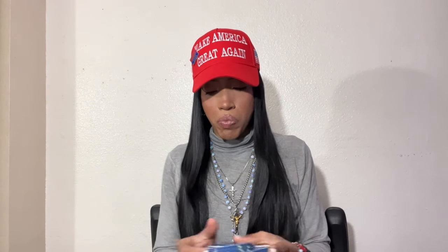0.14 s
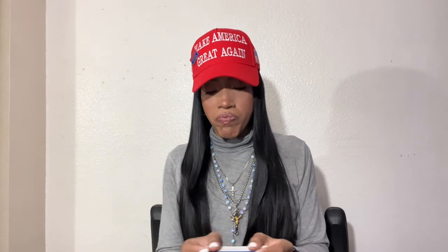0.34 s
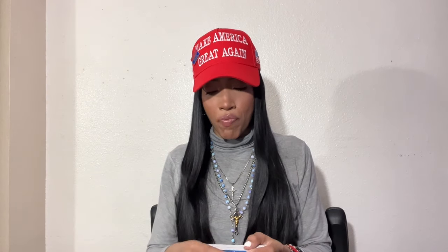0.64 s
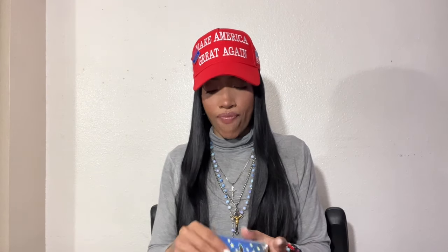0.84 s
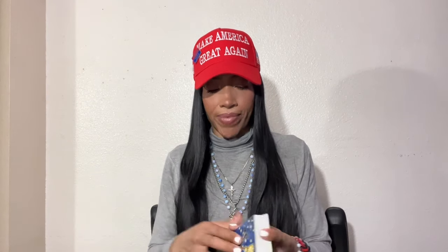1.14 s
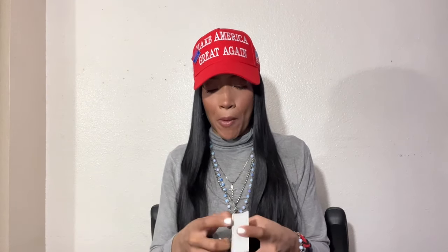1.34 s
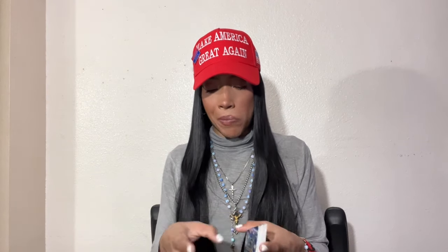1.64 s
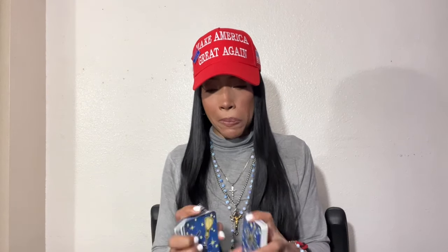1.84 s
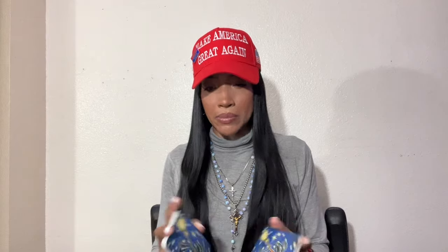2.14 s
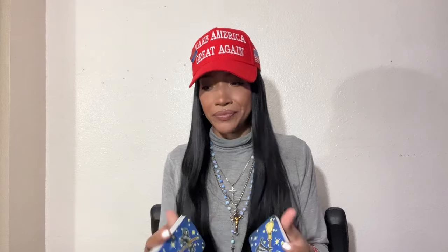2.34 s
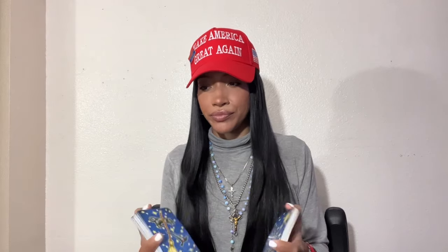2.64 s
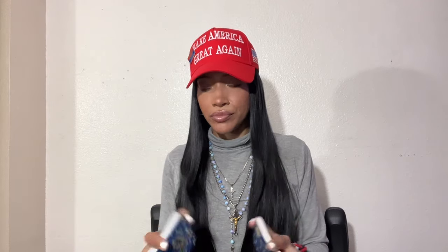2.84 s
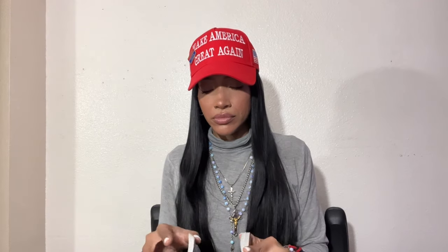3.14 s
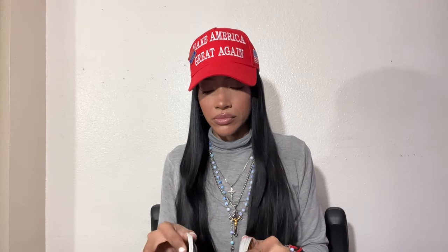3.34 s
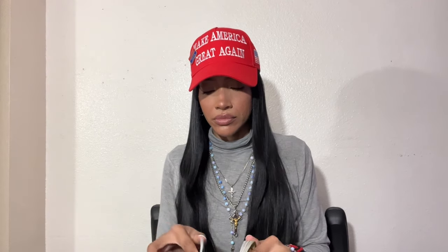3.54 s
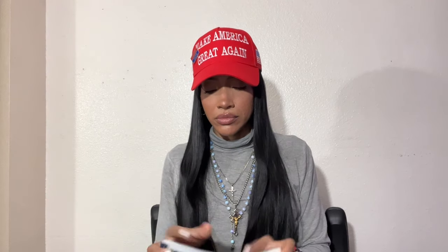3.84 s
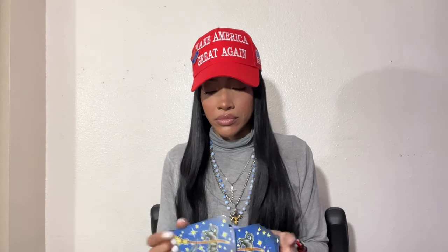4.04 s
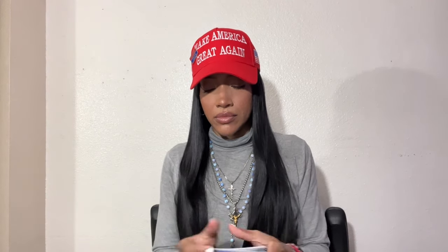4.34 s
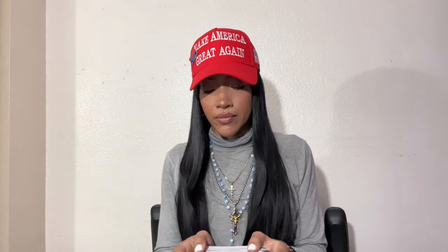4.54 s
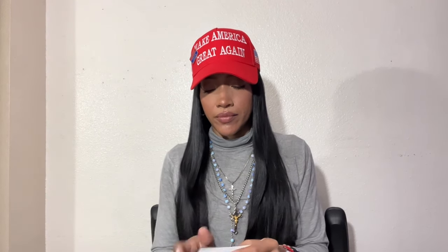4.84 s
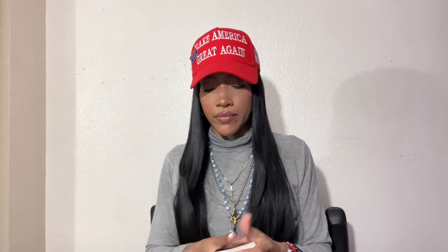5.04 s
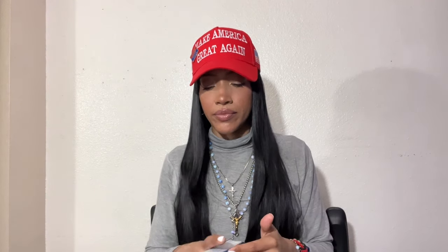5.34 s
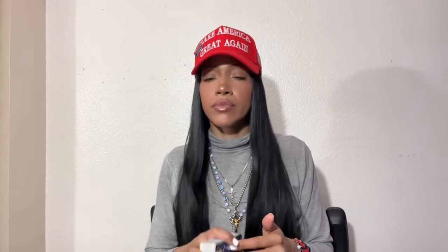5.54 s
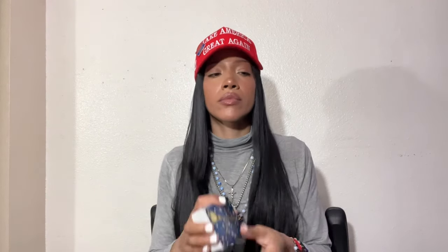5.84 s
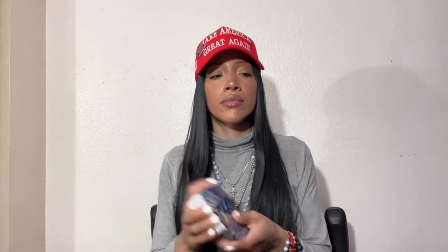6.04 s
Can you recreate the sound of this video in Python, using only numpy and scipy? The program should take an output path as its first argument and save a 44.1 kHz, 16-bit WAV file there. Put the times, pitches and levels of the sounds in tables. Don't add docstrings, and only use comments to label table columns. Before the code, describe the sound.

A deck of cards is squared, cut with a knock, riffled in a crackling burst, then tapped firmly on a table in a quiet room.

```python
import sys
import numpy as np
from scipy import signal
from scipy.fft import rfft, irfft, next_fast_len
from scipy.io import wavfile
from scipy.ndimage import uniform_filter1d

SR = 44100
rng = np.random.default_rng(int(sys.argv[2]) if len(sys.argv) > 2 else 0)


def voltage_ratio(level):
    return 10 ** (np.asarray(level, float) / 20)


def to_wav(s):
    ch = np.atleast_2d(s).T
    pcm = np.round(np.clip(ch, -1, 1) * 32767)
    wavfile.write(sys.argv[1], SR, pcm.astype(np.int16))


N = 272979


def evened(x):
    return x / np.sqrt(np.mean(x ** 2) + 1e-20)


def read(points, hz):
    f, value = np.transpose(points)
    return np.interp(np.log(hz + 1), np.log(f + 1), value)


def add(mix, s, sound):
    part = mix[max(round(s * SR), 0):][:len(sound)]
    part += sound[:len(part)]


def coloured(x, spectrum):
    size = next_fast_len(len(x))
    gain = voltage_ratio(read(spectrum, np.fft.rfftfreq(size, 1 / SR)))
    return evened(irfft(rfft(x, size) * gain, size)[:len(x)])


def ring(t, hz, t60):
    return voltage_ratio(-60 * t / t60) * np.sin(2 * np.pi * hz * t)


def hum():
    # (time [s], level [dB])
    hum_level = [(0.0, -78), (0.17, -53), (2.55, -50.5), (2.71, -63), (3.15, -48), (3.57, -49), (3.64, -46),
                 (3.71, -54), (4.5, -49.5), (4.74, -56.5), (5.12, -48), (5.62, -56), (5.72, -50),
                 (6.19, -51.5)]
    motor_hz, width_hz = 59.6, 0.4
    t = np.arange(N) / SR
    drift = evened(uniform_filter1d(uniform_filter1d(rng.standard_normal(N), 9000), 9000))
    turns = np.cumsum(motor_hz + 0.5 * width_hz * drift) / SR
    return np.sqrt(2) * voltage_ratio(np.interp(t, *np.transpose(hum_level))) * np.sin(2 * np.pi * turns)


def air():
    # (frequency [Hz], level per Hz [dB])
    air_colour = [(20, -27), (55, 9), (90, -1.5), (300, -15.5), (600, -33.5), (1500, -44.5), (15500, -41.5),
                  (16400, -56.5)]
    return voltage_ratio(-57) * np.array([coloured(noise, air_colour) for noise in rng.standard_normal((2, N))])


def strokes():
    # (peak time [s], swell [s], fade [s], rub level [dB], edge over face [dB])
    cut_strokes = [(0.0, .02, 0.21, -55, 2.5), (0.1, 0.59, 0.51, -55.5, -8.5),
                   (0.173, 0.048, 0.071, -42.5, 5.5), (0.295, 0.04, 0.049, -64.5, 14.5),
                   (0.467, 0.17, 0.017, -65.5, 11), (0.655, 0.067, 0.086, -54, 3),
                   (0.78, 0.46, 0.2, -66, 4.5), (0.98, 0.014, 0.12, -65, 2),
                   (1.05, 0.064, 0.086, -71.5, 14), (1.155, .01, .05, -97.5, 7),
                   (1.238, 0.0068, 0.078, -68.5, 6), (1.29, 0.031, 0.049, -78, 20.5),
                   (1.399, .005, 0.95, -79.5, 1), (1.46, 0.023, 0.059, -72.5, 5.5),
                   (1.78, 0.12, 0.16, -72, 12), (1.87, 0.022, 0.23, -63, 7.5),
                   (1.944, 0.032, 0.071, -57.5, -14.5), (2.0, 0.037, 0.065, -77, 13),
                   (2.1, 0.054, 0.075, -102, 29), (2.246, 0.0089, 0.043, -74, -12.5),
                   (2.3, 0.057, 0.18, -84.5, 20), (2.56, 0.28, 0.21, -84.5, 20),
                   (2.781, 0.062, 0.1, -75.5, 9.5), (2.88, 0.061, 0.077, -82.5, 13)]
    # (peak time [s], swell [s], fade [s], rub level [dB], edge over face [dB])
    riffle_strokes = [
        (2.987, 0.008, 0.077, -40.5, 0),
        (3.067, 0.0071, 0.48, -52.5, -12.5),
        (3.159, 0.071, 1, -39, 1.5),
        (3.319, 0.064, 0.27, -41.5, 2.5),
        (3.427, 0.072, 0.054, -40, -10.5),
        (3.515, .04, 0.17, -30, 1),
        (3.637, 0.15, 0.12, -30.5, 0.5),
        (3.76, 0.041, 0.31, -85, 1.5),
    ]
    # (peak time [s], swell [s], fade [s], rub level [dB], edge over face [dB])
    square_strokes = [(3.962, 0.033, 0.024, -49.5, 13.5), (4.065, 0.099, 0.036, -76, 15.5),
                      (4.135, 0.057, 0.1, -49, 8), (4.156, 0.035, 0.09, -47, -11.5),
                      (4.308, 0.044, 0.15, -46.5, -7.5), (4.326, 0.024, 0.19, -48.5, 7),
                      (4.49, 0.062, 0.029, -79, -19), (4.55, 0.08, 0.047, -82, 21),
                      (4.601, 0.057, 0.068, -53.5, 4.5), (4.799, 0.14, 0.15, -56.5, 2.5),
                      (5.031, 0.038, 0.4, -65, -3), (5.141, 0.29, 0.42, -62.5, 3.5),
                      (5.269, 0.015, 0.078, -68.5, -17), (5.341, 0.1, 0.15, -71.5, 4),
                      (5.44, 0.076, 0.049, -57, 8.5), (5.64, 0.013, 0.059, -42, -16),
                      (5.74, 0.11, 0.1, -70, -18), (5.785, 0.04, 0.11, -91, 16),
                      (5.93, 0.004, 0.096, -75.5, 12.5), (6.062, 0.042, 0.036, -45.5, 11),
                      (6.078, 0.044, 0.1, -47, -5)]
    bending_db, bending_tilt = -3, 1.424
    t = np.arange(0, N + 64, 64) / SR
    power = 1e-24
    for s, swell, fade, db, edge_db in cut_strokes + riffle_strokes + square_strokes:
        away = np.maximum((s - t) / max(swell, .002), (t - s) / max(fade, .002))
        shape_db = db - 20 * away
        parts_db = np.array([[bending_db - bending_tilt * edge_db], [0], [edge_db]])
        power = power + voltage_ratio(shape_db + parts_db) ** 2
    return [np.interp(np.arange(N) / SR, t, gain) for gain in np.sqrt(power)]


def slide(grains_per_s=1200, spread_db=1.6, smooth=1.2, patchy_db=3.0):
    # (frequency [Hz], level per Hz [dB])
    rustle = [(70, -48.5), (120, -11), (220, 1), (380, 1.5), (700, -8.5), (1100, -16.5), (2000, -51)]
    # (frequency [Hz], level per Hz [dB])
    face_rub = [(500, -33.5), (900, -7), (1400, -3.5), (2200, -7), (3300, -9.5), (4300, -20.5), (6500, -44)]
    # (frequency [Hz], level per Hz [dB])
    edge_hiss = [(2200, -29), (3700, -1.5), (6000, 8.5), (8000, 13.5), (10500, -5), (12500, 0.5),
                 (15500, -0.5), (16300, -18)]
    # (time [s], spread [s], pitch [Hz], width [Hz], level [dB])
    thumb_squeak = (1.52, .05, 1850, 1100, -77)
    size = voltage_ratio(spread_db * np.minimum(rng.exponential(1, N), 3))
    catches = size * (rng.random(N) < grains_per_s / SR)
    grip = evened(signal.lfilter([1], [1, -.9], catches)) + smooth
    z = signal.stft(grip * rng.standard_normal((2, N)), nperseg=256)[2]
    patches = rng.standard_normal(z.shape[:0:-1]).T
    patches = evened(uniform_filter1d(uniform_filter1d(patches, size=9, axis=0), size=10, axis=1))
    rubbing = signal.istft(z * voltage_ratio(patchy_db * patches), nperseg=256)[1][:, :N]

    t = np.arange(N) / SR
    at, spread, hz, width, db = thumb_squeak
    squeak_colour = [(hz - width, -40), (hz, 0), (hz + width, -40)]
    gains = strokes() + [voltage_ratio(db) * np.exp(-((t - at) / spread) ** 2)]
    colours = (rustle, face_rub, edge_hiss, squeak_colour)
    return np.array([sum(gain * coloured(path, colour) for gain, colour in zip(gains, colours))
                     for path in rubbing])


def table_top(contact_ms):
    # (pitch [Hz], level [dB], time to lose 60 dB [s])
    table_modes = [(109, -22, .09), (117, -12, 0.15), (145.5, -7.5, .15), (184.3, -22.5, 0.29),
                   (216.6, -27, 0.42), (257, -9.5, 0.022), (386.6, 0, 0.051), (635, -18.5, 0.082),
                   (830, -31, 0.07), (1060, -25.5, .12)]
    t = np.arange(SR // 2) / SR
    modes = sum(voltage_ratio(db) * ring(t, hz, t60) for hz, db, t60 in table_modes)
    push = np.hanning(max(round(contact_ms * SR / 1000), 3))
    sound = signal.oaconvolve(modes, push)
    sound = signal.lfilter(*signal.butter(4, 112, "high", fs=SR), sound)
    return sound / abs(sound).max()


def knocks():
    # (time [s], blow level [dB], contact [ms], hollow
    # ring over blow [dB])
    landings = [(0.001, -29.5, 2.9, -11), (0.067, -41.5, 5.6, -20), (0.212, -33, 2.04, -4),
                (1.874, -28, 6.5, -11.5), (1.927, -22.5, 3, 0), (1.96, -29, 2, -2), (2.987, -30, 1.6, 7.5),
                (3.066, -30.5, 5.2, 0), (3.486, -37, 5.2, 15), (3.567, -23, 0.77, -19),
                (3.597, -24.5, 1.5, 3), (4.117, -37.5, 3.3, -16), (4.156, -23.5, 2.8, 2.5),
                (4.319, -34, 3.1, 0.5), (4.382, -39.5, 2.77, -4), (4.488, -39.5, 2.7, 1),
                (4.607, -43, 1.5, -15), (5.259, -41.5, 4.8, 3.5), (5.279, -41, 8.5, 4.5),
                (5.6359, -19.5, 3.7, 8.5), (5.641, -23, 2.7, -1), (5.65, -9.5, 3.55, 0.5)]
    hollow_hz, hollow_t60 = 391, 0.07
    out, t = np.zeros(N), np.arange(SR // 8) / SR
    sinking_hz = hollow_hz * (1 - 0.1 * t / hollow_t60 / 2)
    hollow = ring(t, sinking_hz, hollow_t60) * (1 - np.exp(-t / 0.002))
    for s, db, contact_ms, hollow_db in landings:
        add(out, s, voltage_ratio(db) * table_top(contact_ms))
        add(out, s, voltage_ratio(db + hollow_db) * hollow)
    return out


def flaps(wobble=.12, tail=1.4, apart_db=-0.5):
    # (peak time [s], level [dB], pitch [Hz], swell [ms])
    riffle_flaps = [(3.061, -33, 580, 1.1), (3.07, -34.5, 428, 3.5), (3.077, -28, 351, 4.2),
                    (3.11, -29.5, 1510, 2.2), (3.125, -30.5, 693, 0.59), (3.139, -26.5, 659, 1.3),
                    (3.153, -20.5, 1006, 1.8), (3.165, -24, 2090, 2.3), (3.165, -22, 420, 3.7),
                    (3.192, -23.5, 1098, 1.8), (3.202, -23.5, 423.5, 0.92), (3.213, -26.5, 1080, 0.94),
                    (3.233, -31.5, 1086, 1.8), (3.24, -28, 508, 1.6), (3.27, -30, 690, 1.1),
                    (3.294, -27, 1013, 1.7), (3.318, -25, 3560, 7.6), (3.345, -29.5, 3500, 8.6),
                    (3.385, -29, 804, 1), (3.415, -21.5, 1011, 1.3), (3.437, -24, 631, 1.1),
                    (3.456, -28, 1315, 1.2), (3.47, -26, 1018, 0.83), (3.487, -21, 451, 2),
                    (3.486, -21, 1206, 0.7), (3.505, -16, 609, 0.73), (3.514, -13.5, 1103, 0.69),
                    (3.52, -20, 2200, 2.2), (3.526, -23.5, 795, 1.5), (3.531, -23.5, 2200, 1.9),
                    (3.553, -21, 1415, 1.1), (3.57, -22, 595, 1.2), (3.59, -14, 541.6, 1.5),
                    (3.599, -14, 3200, 1.5), (3.608, -23.5, 1728, 2.2), (3.613, -28, 1306, 2),
                    (3.634, -14, 2900, 3), (3.64, -18, 550, 0.91), (3.644, -20.5, 614.5, 0.77),
                    (3.654, -28.5, 466, 2), (3.668, -26.5, 646, 3), (3.675, -23, 643.4, 2.8),
                    (3.677, -26, 3000, 6.1), (3.681, -17.5, 593.5, 0.92), (3.69, -30, 619, 2.1),
                    (3.716, -31, 781, 2), (3.734, -41, 1484, 2.6), (3.745, -28, 1478, 5.4)]
    # (peak time [s], level [dB], pitch [Hz], swell [ms])
    handling_flaps = [(0.015, -45, 1560, 0.81), (0.028, -50, 1480, 1.2), (0.043, -51, 2040, 1),
                      (0.069, -24, 1500, 1.2), (0.078, -35, 924, 3.1), (0.093, -30, 708.5, 8),
                      (0.105, -29, 1510, 1.6), (0.118, -49, 907, 1.9), (0.164, -43, 1686, 2),
                      (0.281, -41.5, 996, 0.98), (0.296, -50, 890, 1.3), (0.313, -50, 1566, 1.7),
                      (0.408, -78, 1080, 1.6), (0.615, -60.5, 1564, 4), (0.64, -54, 1513, 7.1),
                      (0.679, -57, 1322, 6.2), (0.66, -54, 1484, 4.4), (0.771, -55, 5020, 4),
                      (0.8, -61, 2100, 6.2), (0.86, -81, 1500, 4.1), (0.939, -59.5, 3000, 3.8),
                      (0.999, -56.5, 11350, 13), (1.087, -53, 12500, 1.4), (1.19, -54.5, 11900, 0.93),
                      (1.773, -53, 13200, 1.5), (1.929, -26, 590, 0.93), (2.156, -56, 11500, 0.77),
                      (2.204, -66, 1460, 0.67), (2.533, -58, 11300, 1.9), (4.118, -50, 417, 2.4),
                      (4.132, -44, 411, 2.1), (4.153, -25.5, 1137, 3.5), (4.189, -41, 517, 2),
                      (4.203, -45, 335, 4.7), (4.209, -49, 2100, 3.2), (4.22, -53, 417, 3.8),
                      (4.272, -45, 397, 3.3), (4.294, -35.5, 704, 3.3), (4.31, -39, 316, 2.4),
                      (4.355, -38.5, 608, 2.5), (4.361, -45, 347, 3.2), (4.42, -52.5, 1427, 6.4),
                      (4.519, -53, 370, 7.4), (4.634, -46, 395, 3.9), (4.654, -51, 414, 1.9),
                      (5.665, -25.5, 378.7, 7.4), (5.69, -33.5, 329, 2.8), (5.74, -38.5, 398, 4.1),
                      (5.79, -51, 399, 17), (5.645, -33.5, 1488, 6.8), (0.968, -50, 12000, 1.7),
                      (4.61, -42, 403, 2.6), (5.95, -51.5, 201.5, 8.9)]
    # (peak time [s], level [dB], pitch [Hz], swell [ms])
    more_flaps = [(0.296, -47, 6300, 2), (0.088, -34, 1600, 0.9), (0.655, -56, 4600, 12),
                  (0.91, -52, 4200, 0.6), (1.928, -31.5, 2600, 0.42), (2.973, -54.5, 1100, 1.2),
                  (2.991, -28.5, 1400, 1.2), (2.991, -34.5, 3000, 0.9), (3.007, -36, 2200, 1.2),
                  (3.162, -27.5, 5200, 1.3), (3.227, -28.5, 3400, 1.6), (3.59, -18.5, 3000, 0.9),
                  (3.568, -26, 4600, 0.79), (4.324, -40, 1500, 0.5), (6.071, -36, 6300, 1.2),
                  (6.094, -37, 1300, 4.6), (4.36, -44, 700, 8.3)]
    lead_s = .03
    out, t = np.zeros((2, N)), np.arange(-1024, 2048) / SR
    for s, db, hz, swell_ms in riffle_flaps + handling_flaps + more_flaps:
        shake = uniform_filter1d(rng.standard_normal((2, len(t))), size=24, axis=1)
        turns = np.cumsum(hz * (1 + wobble * evened(shake)), axis=1) / SR
        wave = np.sin(2 * np.pi * turns)
        shape = np.exp(-(1000 * t / (swell_ms * np.where(t > 0, tail, 1))) ** 2)
        for path in (0, 1):
            add(out[path], s + lead_s, voltage_ratio(db + path * apart_db) * shape * wave[path])
    early = round(lead_s * SR) + 1024
    return np.pad(out[:, early:], [(0, 0), (0, early)])


def snaps(rows, tick_db, slap_db, flutter_db, flutter_ms, stiff, push_db, push_share, edge_hz, cycles, tick_ms=1.0):
    cards, pushes, t = np.zeros((2, N)), np.zeros((2, N)), np.arange(2048) / SR
    rise = (1 - np.exp(-t / 0.00032)) ** 2
    flutter = voltage_ratio(flutter_db) * np.exp(-1000 * t / flutter_ms)
    crack = voltage_ratio([[0.0], [9.0]]) * np.exp(-1000 * t / tick_ms)
    for s, db, hz, bright_db in rows:
        tick, rattle = rng.standard_normal((2, 2, len(t)))
        late = 0.0023 * rng.random()
        edge = signal.butter(3, [edge_hz * rng.uniform(0.38, 1.52), 17000], "band", fs=SR)
        tick = signal.lfilter(*edge, tick * rise * (crack + voltage_ratio(-2.5) * flutter))

        turns = hz * t * (1 + 0.65 * np.exp(-t / 0.00077))
        swing = 2 * hz * t / cycles
        slap = np.sin(2 * np.pi * turns) * (swing * np.exp(1 - swing)) ** 1.8
        face = signal.butter(3, [0.49 * hz, stiff * hz], "band", fs=SR)
        rattle = signal.lfilter(*face, rattle)
        slap = slap + voltage_ratio(7.5) * rattle * flutter * rise

        on_table = s < 5.9
        push = voltage_ratio([push_share * db + push_db]) * np.sign(rattle[0, 9]) * on_table
        for path in (0, 1):
            add(cards[path], s, voltage_ratio(bright_db + tick_db) * tick[path])
            add(cards[path], s + 0.0006 + path * late, voltage_ratio(db + slap_db) * slap[path])
            add(pushes[path], s + 0.0022 + 3 * path * late, push)
    return cards + signal.oaconvolve(pushes, table_top(0.94)[None], axes=1)[:, :N]


def handling():
    # (time [s], slap level [dB], slap pitch [Hz], edge tick level [dB])
    cutting = [(0.041, -29.5, 980, -76), (0.069, -20.5, 940, -74), (0.087, -23, 1060, -65),
               (0.099, -22, 760, -68), (0.215, -36, 740, -64), (0.28, -36, 830, -54),
               (0.312, -42, 790, -76), (0.482, -50.5, 1400, -44.5), (0.748, -46.5, 1470, -59),
               (0.909, -50, 1780, -66), (0.966, -55, 1150, -52), (0.99, -58, 670, -58),
               (1.034, -50, 1310, -47), (1.054, -54.5, 1330, -54), (1.113, -80, 611, -56),
               (1.154, -72, 646, -48.5), (1.239, -41.5, 1140, -58), (1.284, -53, 1830, -48.5),
               (1.347, -57, 1030, -83), (1.4, -49, 1193, -63), (1.769, -69, 870, -61),
               (1.868, -49, 1150, -65), (1.928, -23, 1070, -46), (2.242, -57, 596, -74)]
    # (time [s], slap level [dB], slap pitch [Hz], edge tick level [dB])
    squaring = [(3.925, -42.5, 1370, -46), (3.961, -38, 1400, -52), (4.063, -69, 1640, -41),
                (4.115, -29.5, 910, -55), (4.149, -24, 1060, -56), (4.156, -26, 877, -55),
                (4.186, -29.5, 744, -67), (4.269, -37, 785, -57), (4.303, -22, 1164, -56),
                (4.319, -37, 1050, -35), (4.381, -34, 1120, -60.5), (4.594, -38.5, 970, -55),
                (4.605, -33.5, 956, -68), (4.784, -71, 2030, -47), (5.025, -49.5, 738, -76),
                (5.11, -58.5, 953, -53), (5.445, -50, 499, -67.5), (5.623, -38, 1555, -76),
                (5.636, -40, 576, -65.5), (5.641, -21.5, 1000, -63.5), (5.931, -55.5, 817, -51.5),
                (6.046, -33.5, 1290, -35), (6.07, -23.5, 1750, -32), (6.074, -23.5, 617, -50),
                (6.085, -24.5, 1110, -60.5)]
    return snaps(cutting + squaring, tick_db=7.0, slap_db=-0.5, flutter_db=-10.0, flutter_ms=6.3, stiff=1.98,
                 push_db=-10.5, push_share=1.0, edge_hz=7600, cycles=1.99)


def riffle():
    # (time [s], slap level [dB], slap pitch [Hz], edge tick level [dB])
    riffle_start = [(2.959, -78, 2990, -44), (2.986, -28, 604, -29.5), (2.989, -16, 700, -36.5),
                    (3.0645, -21, 614, -27.5), (3.0965, -2.5, 1227, -25), (3.123, -18, 1597, -36.5),
                    (3.141, -16, 1100, -28.5), (3.148, -9.5, 982, -26.5), (3.161, -16.5, 1033, -34),
                    (3.187, -11, 1055, -28), (3.199, -17.5, 1196, -32.5), (3.2235, -8.5, 1240, -28.5),
                    (3.25, -15.5, 1470, -29), (3.276, -10, 1080, -39.5), (3.291, -14.5, 1146, -31.5),
                    (3.304, -12, 1480, -53.5), (3.315, -21.5, 911, -24), (3.321, -9, 1240, -23.5),
                    (3.329, -26.5, 1265, -21.5), (3.342, -14, 1162, -38.5), (3.357, -11.5, 1203, -44)]
    # (time [s], slap level [dB], slap pitch [Hz], edge tick level [dB])
    riffle_end = [(3.406, -7, 1254, -21.5), (3.412, -25, 1000, -21.5), (3.434, -7, 1170, -21.5),
                  (3.467, -19, 1500, -44.5), (3.479, -2, 1360, -17.5), (3.485, -15, 1140, -31.5),
                  (3.502, -2.5, 1680, -18), (3.511, -25, 1220, -20), (3.523, -17.5, 635, -29),
                  (3.551, -5, 1520, -29), (3.566, -17, 1132, -28.5), (3.587, -4, 1095, -19.5),
                  (3.597, -5, 1295, -37), (3.605, -16.5, 1767, -32.5), (3.6276, -11, 605, -29.5),
                  (3.632, -8, 2870, -29), (3.636, -14.5, 2730, -34.5), (3.642, -17, 1324, -32),
                  (3.658, -33, 649, -44), (3.677, -13.5, 980, -36), (3.705, -8, 1170, -29.5),
                  (3.729, -5, 1220, -28.5)]
    return snaps(riffle_start + riffle_end, tick_db=9.0, slap_db=-5.0, flutter_db=-11.5, flutter_ms=8.4, stiff=2.5,
                 push_db=-31.0, push_share=0.16, edge_hz=3570, cycles=1.47)


def room():
    # (frequency [Hz], time to lose 60 dB [s])
    room_t60 = [(100, 0.46), (400, 0.23), (1500, 0.14), (5000, 0.29), (14000, 0.048)]
    taps = np.zeros((2, SR // 2))
    at = np.arange(130, SR // 2 - 20, 20)
    at = at + rng.integers(0, 20, (2, len(at)))
    np.put_along_axis(taps, at, rng.choice([-1., 1.], at.shape), 1)
    hz, t, z = signal.stft(taps, SR, nperseg=256)
    tail = signal.istft(z * voltage_ratio(-60 * t / read(room_t60, hz)[:, None]), SR, nperseg=256)[1]
    return voltage_ratio(-7.5) * tail / np.linalg.norm(tail[0])


def ports(pair, most_alike=((0, 1), (1, 1))):
    # (frequency [Hz], phase [radians])
    port_phase = [(0, 0), (2500, -1.4), (3800, -3), (7000, -np.pi), (8900, -np.pi), (10200, 0), (12800, 0),
                  (14100, np.pi)]
    # (frequency [Hz], level [dB])
    port_balance = [(100, -2), (700, -2.6), (2400, -1.2), (4400, -4), (5300, -6.5), (6600, -4), (7500, -.5),
                    (10000, 0)]
    # (frequency [Hz], likeness [0-1])
    port_same = [(120, .985), (700, .72), (2000, .7), (4500, .25), (7500, .99), (9000, .99), (9600, .6),
                 (10300, .992)]
    size = next_fast_len(N + 4096)
    hz = np.fft.rfftfreq(size, 1 / SR)
    lead = np.interp(hz, *np.transpose(port_phase))
    half = voltage_ratio(read(port_balance, hz) / 2) * np.exp(.5j * lead)
    turn = np.arccos(np.minimum(read(port_same, hz), read(most_alike, hz))) / 2
    shared, apart = rfft(pair, size) * [np.cos(turn), np.sin(turn)]
    return irfft([(shared + apart) * half, (shared - apart) / half], size)[:, :N]


def scene():
    # (frequency [Hz], top likeness [0-1])
    snap_same = [(9000, .88), (14500, .975)]
    floor = hum() + air()
    rubbing, boom = slide(), knocks()
    cards = flaps() + handling() + riffle()
    to_walls = cards[0] + 0.48 * boom + 0.4 * rubbing[0]
    echo = signal.fftconvolve(to_walls[None], room(), axes=1)[:, :N]
    around = boom * [[1], [.5]] + rubbing + echo + floor
    return ports(cards, most_alike=snap_same) + ports(around)


def low_pass(x):
    return signal.sosfilt(signal.butter(12, 16530, fs=SR, output="sos"), x)


def record(dry):
    band_limit = signal.firwin(511, 15950, window=("kaiser", 7), fs=SR)
    mix = signal.oaconvolve(dry, band_limit[None], "same")
    return low_pass(mix)


dry = scene()
out = record(dry)
to_wav(out)
```